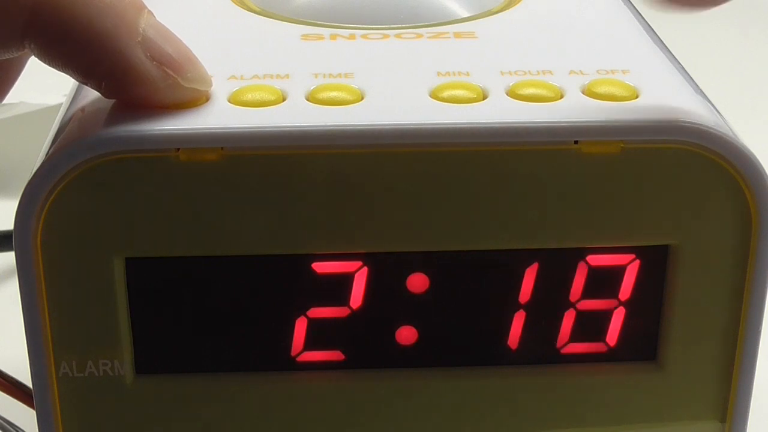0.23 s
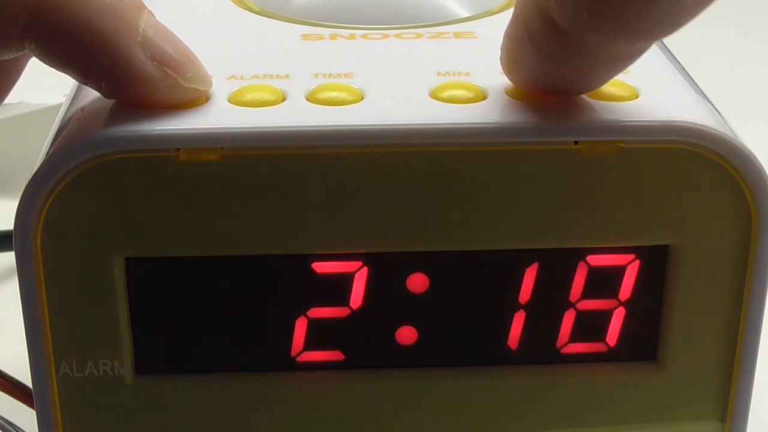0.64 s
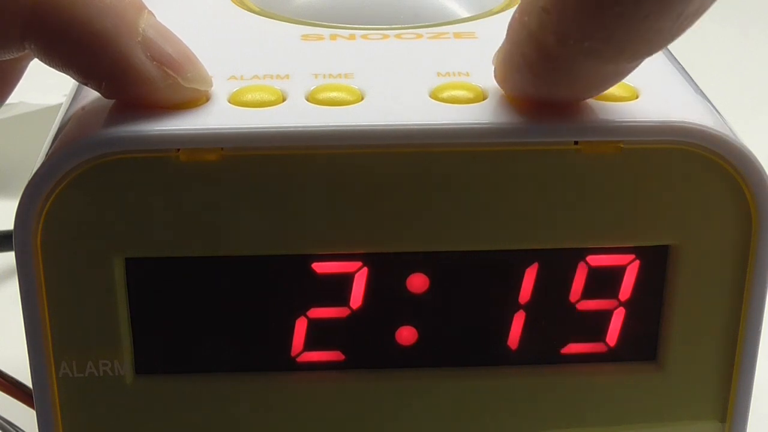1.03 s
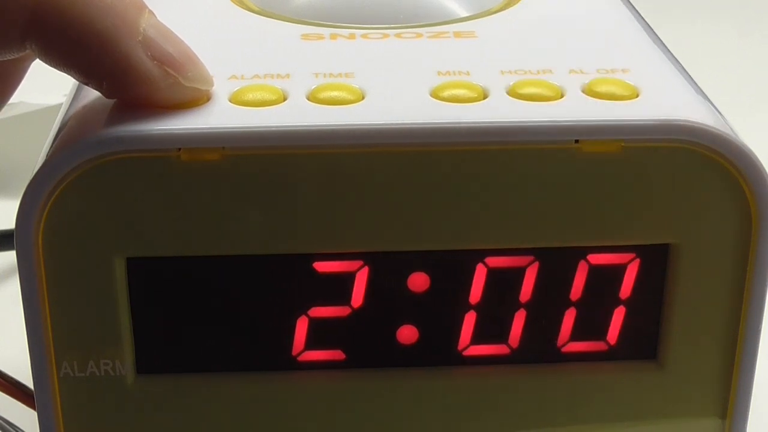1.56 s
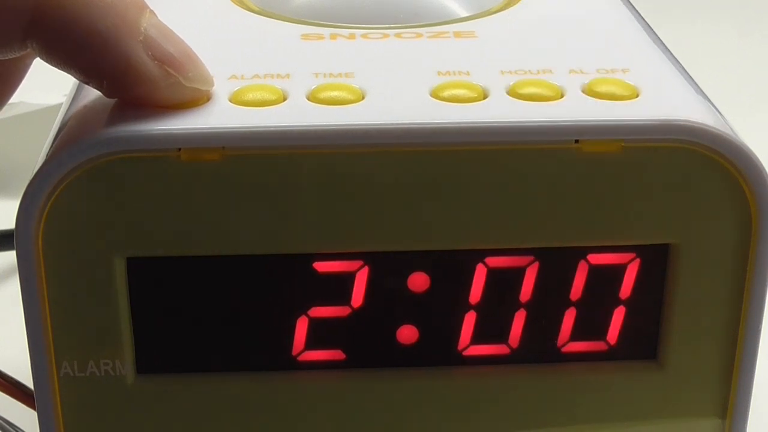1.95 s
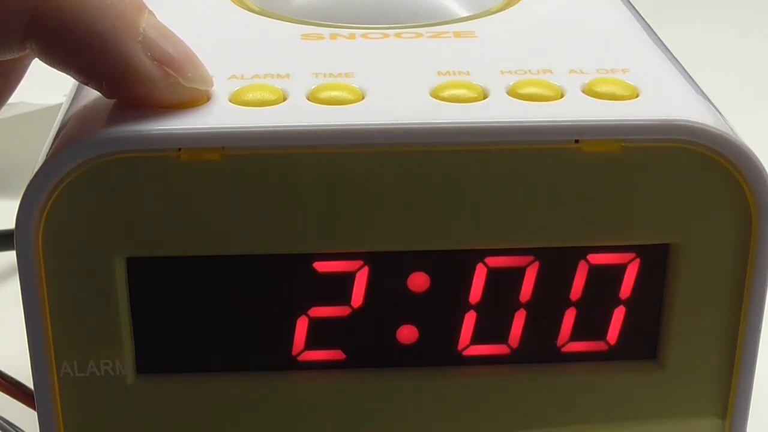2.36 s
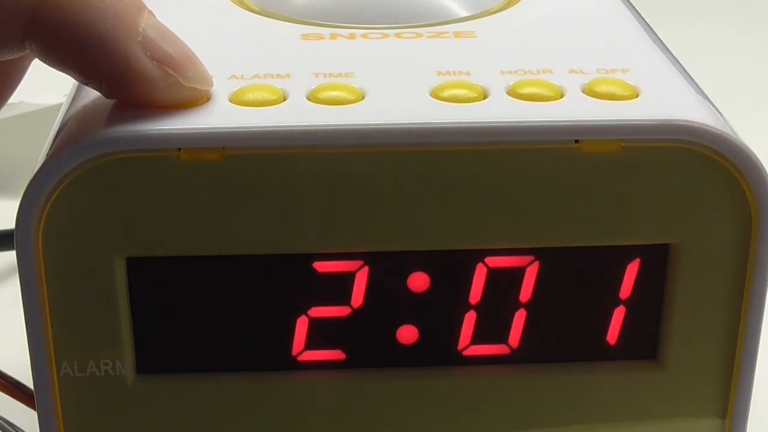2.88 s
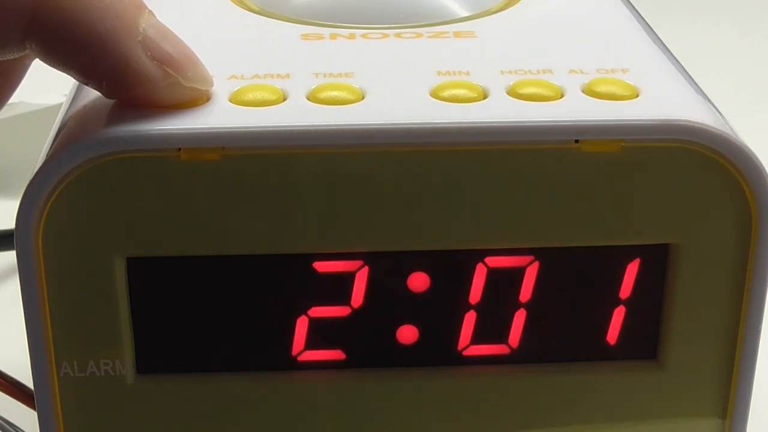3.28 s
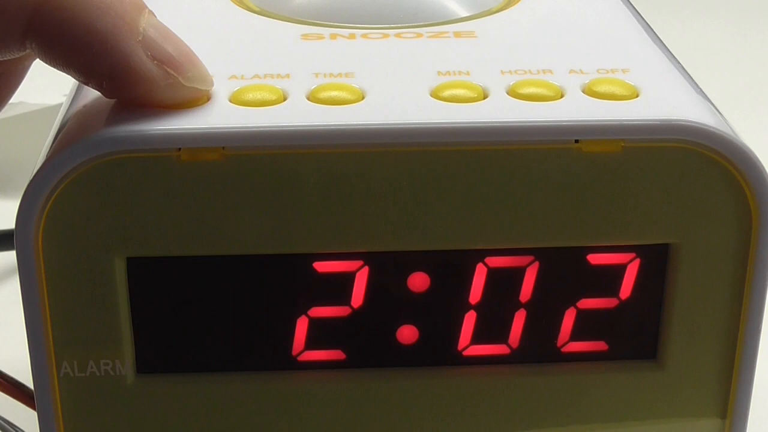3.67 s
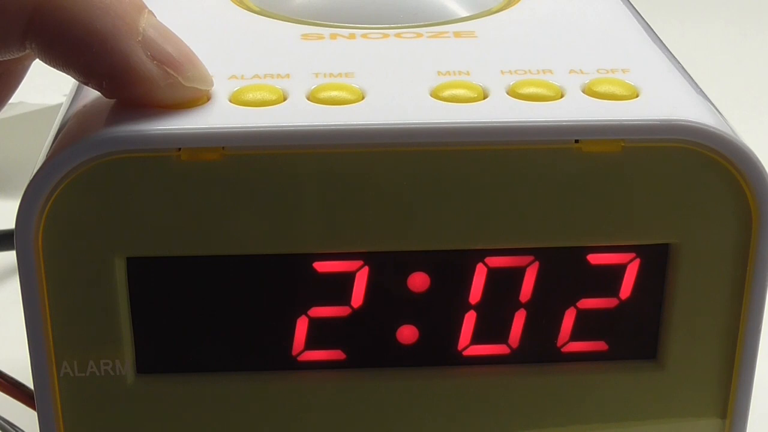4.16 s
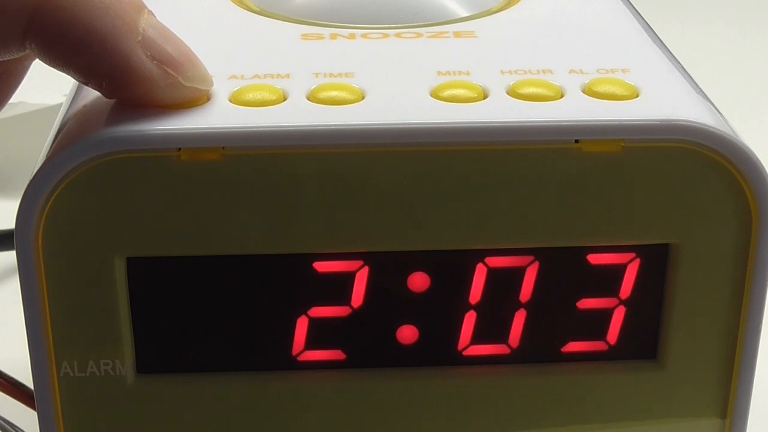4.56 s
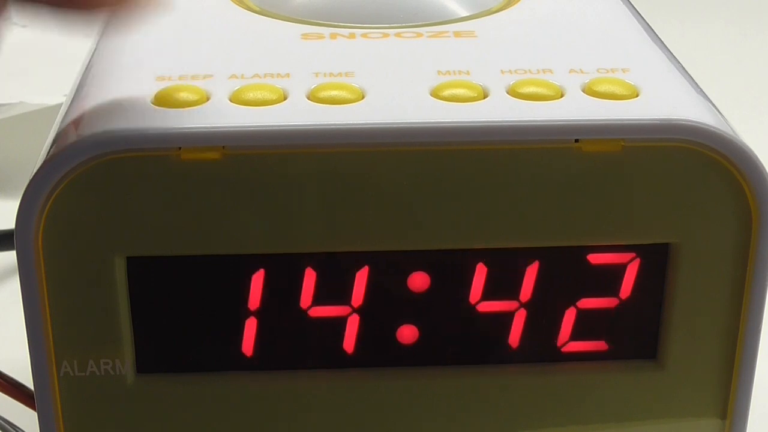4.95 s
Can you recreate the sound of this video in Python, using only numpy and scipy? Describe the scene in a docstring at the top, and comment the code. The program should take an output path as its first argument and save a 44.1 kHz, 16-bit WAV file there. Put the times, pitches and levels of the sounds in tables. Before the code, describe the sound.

Close to the microphone, a finger presses a small plastic clock button: a crisp, bright snap with a hollow case knock at about 1.3 seconds, then its spring-back click a third of a second later. A long quiet stretch follows with faint fan air, hum and hiss. Near 5.1 seconds a held button eases up with a softer, duller clunk. Small room, short echoes.

```python
"""Bedside clock button, close by

A finger settles on a plastic button of a bedside clock, clicks it down and lets it spring back; later a
held button is let go. Each click is shaped noise and short modes for the bright snap of the switch, with
slower damped modes for the hollow knock of the case, its flexing lid and the low thud on the table.
The room is small and quiet: short echoes, a faint fan, mains hum, soft hand rumble and microphone hiss."""
import sys
import numpy as np
from scipy import signal
from scipy.fft import rfft, irfft, next_fast_len
from scipy.io import wavfile
from scipy.ndimage import map_coordinates

SR = 44100
rng = np.random.default_rng(int(sys.argv[2]) if len(sys.argv) > 2 else 0)


def to_wav(s):
    """Save 16-bit WAV."""
    ch = np.atleast_2d(s).T  # columns
    pcm = np.round(np.clip(ch, -1, 1) * 32767)  # PCM
    wavfile.write(sys.argv[1], SR, pcm.astype(np.int16))


N = 229893

# Button down, spring back, held button let go: (time [s], snap before switch gain [dB], knock [dB],
# contact hardness [Hz], knock pitch [ratio], thud [dB], lid flex [dB])
CLICK_EVENTS = [(1.3162, -19, -16, 1500, 0.98, -28, -41.5), (1.6497, -17.5, -12.5, 985, .992, -29.5, -41),
                (5.0655, -34, -15.5, 707, 1.008, -29.5, -29.5)]
# Light fingertip contacts: (time [s], length [s], case level before swell [dB], rub level before swell [dB])
FINGER_TOUCHES = [(0.812, 0.018, -75, -75), (1.018, 0.011, -61, -76), (1.026, 0.049, -58.5, -74),
                  (5.135, 0.014, -57.5, -60.5)]
# Hollow case, before the knock pitch ratio: (frequency [Hz], level [dB], t60 [s], rise [s])
CASE_MODES = [(565.7, -12.5, .13, 0.056), (615, -12, 0.11, 0.0264), (652, 3, 0.045, .017),
              (701, 7.5, 0.034, 0.0048), (914, 7.5, .011, 0.003), (1010, -18, 0.045, 0.00652),
              (1255, -9.5, 0.027, 0.0019), (1350, -20.5, 0.0367, 0.001004)]
# Lid, which flexes most under the outermost button: (frequency [Hz], level [dB], t60 [s], rise [s])
LID_MODES = [(364, -1, 0.034, 0.0025), (421, 0, 0.05, .002), (497.5, 0.5, 0.059, .003)]
# Clock rocking on the table: (frequency [Hz], level [dB], t60 [s], rise [s])
TABLE_MODES = [(121, -13.5, 0.08, .0085), (157, -5, 0.045, 0.0052), (224.8, -9, 0.14, 0.0071),
               (239, 6, .069, .021), (281.7, -10, 0.14, 0.01814)]
# Stiff button and its switch, before the snap colour: (frequency [Hz], level [dB], t60 [s])
BUTTON_MODES = [(3233, -1, 0.027), (3710, -7.5, 0.023), (3886, -3, 0.021), (4770, -0.5, 0.012),
                (5130, 1, 0.011), (6560, 2, 0.011), (7000, 0, 0.0083), (7320, -2, 0.047),
                (8400, -5, 0.0065), (9740, 1, 0.033), (9300, 6.5, 0.0067), (10480, -1, 0.015),
                (12000, -4, 0.02), (13350, -8.5, .015)]
# Snap colour of a button going down: (frequency [Hz], gain [dB])
SNAP_DOWN_COLOUR = [(150, -33.5), (1300, -5), (2200, -10), (2700, -14), (3100, -2), (4000, -3), (4750, 2),
                    (5700, -6), (6300, -0.5), (8000, -3), (9600, -1), (11000, -9.5), (13600, -5.5),
                    (14600, -33)]
# Snap colour of a button springing back: (frequency [Hz], gain [dB])
SNAP_BACK_COLOUR = [(150, -36), (1400, -12.5), (1850, -5), (2800, -10.5), (3300, -1), (4600, -4),
                    (5700, -5), (6400, -2), (9300, 2.5), (10500, -3), (11400, -7.5), (12100, 0),
                    (14400, -5.5), (15500, -25)]
# Snap colour of the held button easing up: (frequency [Hz], gain [dB])
SNAP_EASE_COLOUR = [(150, -24), (400, 4), (700, 1), (1300, 9.5), (1750, 0), (2100, 4.5), (2650, -8),
                    (3300, 6.5), (4100, -14.5), (5000, 3), (6200, -14.5), (7000, -1), (8600, -13),
                    (9900, -1), (13500, -21)]
# Likeness of the snap at left and right: (frequency [Hz], likeness [0-1])
SNAP_LIKENESS = [(1000, 0.74), (3500, 0.99), (6500, 0.82), (9500, .35), (13000, 0.63)]
# Balance of the snap: (frequency [Hz], left minus right [dB])
SNAP_BALANCE = [(3000, -0.5), (4800, 0.5), (6500, -1), (9500, 3.5), (12500, -5)]
# Skin on plastic, relative spectrum: (frequency [Hz], level [dB])
RUB_SPECTRUM = [(300, -2), (1650, -5), (1930, 3.5), (2200, -9), (2900, -12), (3400, -9), (4000, -22),
                (12000, -30)]
# Decay of the room: (frequency [Hz], t60 [s])
ROOM_DECAY = [(150, 0.42), (600, 0.21), (1500, 0.1), (5000, .2), (9000, 0.16), (15000, 0.11)]
# Colour of the room: (frequency [Hz], gain [dB])
ROOM_GAIN = [(80, -11.5), (300, -7), (700, -9.5), (1200, 1.5), (3300, -4.5), (4800, -5.5), (9000, -3.5),
             (12000, -7.5), (16000, -11)]
# Likeness of the room at left and right: (frequency [Hz], likeness [0-1])
ROOM_LIKENESS = [(200, 0.48), (900, 0.79), (3500, 0.64), (6500, 0.06), (10000, 0)]
# The hand's rumble on the case, relative spectrum: (frequency [Hz], level [dB])
HAND_SPECTRUM = [(60, -30.5), (170, -16.5), (250, -1), (310, -2.5), (420, -12.5), (700, -25.5), (3000, -54)]
# The hand shifts its grip: (time of the height [s], level [dB])
GRIP_SHIFTS = [(2.597, -63.5), (3.04, -68), (3.137, -62), (4.385, -63.5)]
# Fan air, relative spectrum before resonances: (frequency [Hz], level [dB])
AIR_SPECTRUM = [(20, 4), (62, -4.5), (100, -1.5), (190, -1), (330, -0.5), (500, -5.5), (780, -5.5),
                (1200, -11.5), (1800, -16.5), (2600, -22), (6000, -25), (16000, -56)]
# Resonances that colour the fan: (frequency [Hz], width [Hz], gain [dB])
FAN_RESONANCES = [(50.8, 10, 3.5), (83.5, 8.9, 6.5), (127.3, 6.7, 9.5), (286.5, 23.8, 8), (886.6, 64, 8.5),
                  (992, 74, 7), (1445, 105, 9.5), (1613, 85, 10.5), (2186, 260, 5)]
# Mains hum and steady higher tones, before panning: (frequency [Hz], level [dB rms])
HUM_TONES = [(100, -91), (199.6, -79), (299.5, -88.5), (399.5, -85), (500, -89.5), (599.6, -82.5),
             (700, -98), (3000, -97), (7825, -93), (12000, -99.5)]
# Microphone hiss, relative spectrum: (frequency [Hz], level [dB])
HISS_SPECTRUM = [(100, -13), (2500, -8.5), (4500, -8), (6100, -14.5), (7000, -6.5), (8000, -1.5),
                 (9500, -1), (12000, 0.5), (13500, -1.5), (15600, -3.5)]
# Balance of the hiss: (frequency [Hz], left minus right [dB])
HISS_BALANCE = [(2400, -0.5), (4400, 1.5), (8000, 0), (15000, -3)]

# The hand's rumble rises from the start, then levels off
GRIP_START_DB, GRIP_RISE_DB_PER_S, GRIP_FULL_DB = -82.5, 4, -68
SHIFT_S = 0.022  # from the height of a shift to about a third of it
TOP_HZ, HISS_TOP_HZ = 16300, 15750
HALF_SIDES = np.array([[.5], [-.5]])  # left, right


def amp(db):
    """Decibels to gain."""
    return 10 ** (np.asarray(db) / 20)


def unit(x):
    """Scale to rms 1."""
    return x / np.sqrt(np.mean(x ** 2) + 1e-20)


def along(points, hz):
    """Read (frequency, value) points on a log frequency axis."""
    f, v = np.transpose(points)
    return np.interp(np.log(hz + 1), np.log(f + 1), v)


def wobble(rate):
    """A smooth random curve with rate knots a second."""
    knots = rng.standard_normal(int(N * rate / SR) + 4)
    return map_coordinates(knots, [np.arange(N) * rate / SR])


def filtered(x, response):
    """Multiply the spectrum of x by a response of frequency."""
    n = x.shape[-1]
    m = next_fast_len(n + SR // 4)
    return irfft(rfft(x, m) * response(np.fft.rfftfreq(m, 1 / SR)), m)[..., :n]


def noise(spectrum, size):
    """Coloured noise of rms 1."""
    return unit(filtered(rng.standard_normal(size), lambda hz: amp(along(spectrum, hz))))


def spread(pair, alike):
    """Mix two unrelated signals into left and right of a given likeness."""
    turn = lambda hz: np.arccos(np.clip(along(alike, hz), -1, 1)) / 2
    mid, side = filtered(pair, lambda hz: np.array([np.cos(turn(hz)), np.sin(turn(hz))]))
    return np.array([mid + side, mid - side])


def fade(t, t60):
    """Decay by 60 dB in t60 seconds."""
    return np.exp(-np.log(1000) * t / t60)


def add(track, s, sound):
    """Mix a sound into the track at s seconds."""
    part = track[:, round(s * SR):][:, :sound.shape[-1]]
    part += sound[..., :part.shape[1]]


def clicks(ring_db, switch_db=5, knock_delay=0.00041, thud_delay=.004):
    """Each snap knocks the case and flexes its lid; the clock then thuds on the table (delays in s)."""
    out, t = np.zeros((2, N)), np.arange(SR // 4) / SR
    colours = (SNAP_DOWN_COLOUR, SNAP_BACK_COLOUR, SNAP_EASE_COLOUR)
    for event, colour in zip(CLICK_EVENTS, colours):
        s, snap_db, knock_db, hard_hz, pitch, thud_db, flex_db = event
        add(out, s, amp(snap_db + switch_db) * snap(t, colour, ring_db))
        # running the case faster or slower scales its decay with its pitch
        add(out, s + knock_delay, amp(knock_db) * ring(CASE_MODES, pitch * t, hard_hz, lead=.14))
        add(out, s + knock_delay, amp(flex_db) * ring(LID_MODES, t, hard_hz, lead=.08))
        add(out, s + thud_delay, amp(thud_db) * ring(TABLE_MODES, t, hard_hz, lead=0.1))
    return out


def snap(t, colour, ring_db, tick_t60=0.0082, chatter_t60=.025, chatter_rise=0.0014, split_hz=7000):
    """The switch flips: a sharp bright tick, slower chatter below it and the button's short modes."""
    grain = rng.standard_normal((2, len(t)))
    bright = filtered(grain, lambda hz: 1 / (1 + (split_hz / (hz + 1)) ** 4))
    tick = bright * fade(t, tick_t60)
    chatter = (grain - bright) * fade(t, chatter_t60) * (1 - np.exp(-t / chatter_rise))
    modes = np.zeros((2, len(t)))
    for hz, db, t60 in BUTTON_MODES:
        cycles = hz * t + rng.random((2, 1))
        modes += amp(db) * np.sin(2 * np.pi * cycles) * fade(t, t60)
    pair = spread(tick + chatter + amp(ring_db) * modes, SNAP_LIKENESS)
    return filtered(pair, lambda hz: amp(along(colour, hz) + HALF_SIDES * along(SNAP_BALANCE, hz)))


def ring(modes, t, hard_hz, lead):
    """Damped modes swell as the blow spreads; a soft contact dulls the high ones, and left leads (rad)."""
    phase = np.array([[lead], [-lead]])
    body = np.zeros((2, len(t)))
    for hz, db, t60, rise in modes:
        envelope = fade(t, t60) * (1 - np.exp(-t / rise))
        body += amp(db) * np.sin(2 * np.pi * hz * t + phase) * envelope
    return signal.sosfilt(signal.butter(3, hard_hz, fs=SR, output="sos"), body)


def touches(case_hz=690, slip=0.046):
    """Skin drags briefly on a button; the case sings, its phase slipping (rad per sample) at random."""
    out = np.zeros((2, N))
    for s, length, case_db, rub_db in FINGER_TOUCHES:
        n = int(length * SR)
        steps = 2 * np.pi * case_hz / SR + slip * rng.standard_normal(SR // 10)
        case = unit(np.sin(np.cumsum(steps)[:n]))
        rub = noise(RUB_SPECTRUM, SR // 10)[:n]
        swell = np.sin(np.pi * np.arange(n) / n)
        add(out, s, swell * (amp(case_db) * case + amp(rub_db) * rub))
    return out


def room(x, gap=.006):
    """Nearby walls answer after a short gap (s), with a decay time for each pitch range."""
    hz, t, z = signal.stft(rng.standard_normal((2, SR // 3)), SR, nperseg=256)
    decaying = z * fade(t, along(ROOM_DECAY, hz)[:, None])
    tail = signal.istft(decaying, SR, nperseg=256)[1]
    tail = spread(tail / np.linalg.norm(tail[0]), ROOM_LIKENESS)
    tail = filtered(tail, lambda hz: amp(along(ROOM_GAIN, hz)))
    delayed = np.pad(tail, ((0, 0), (int(gap * SR), 0)))
    return signal.fftconvolve(x, delayed, axes=1)[:, :N]


def hand_rumble(t, flutter_db=0.5):
    """The hand on the case gives a soft, low noise whose level flutters and follows the grip."""
    return grip(t) * amp(flutter_db * wobble(6.5)) * noise(HAND_SPECTRUM, (2, N))


def grip(t):
    """Gain of the hand's rumble: a steady rise to a ceiling, with a brief swell at each shift."""
    held = amp(np.minimum(GRIP_START_DB + GRIP_RISE_DB_PER_S * t, GRIP_FULL_DB))
    swells = sum(amp(db) * np.exp(-((t - s) / SHIFT_S) ** 2) for s, db in GRIP_SHIFTS)
    return np.hypot(held, swells)


def fan_air(level_db=-66.0, waver_db=0.5):
    """A faint fan: air noise coloured by resonances, its level wavering slowly."""
    bumps = lambda hz: amp(sum(db * np.exp(-2 * ((hz - centre) / width) ** 2)
                               for centre, width, db in FAN_RESONANCES))
    air = unit(filtered(noise(AIR_SPECTRUM, (2, N)), bumps))
    return amp(level_db + waver_db * wobble(3.2)) * air


def mains_hum(t, drift=0.53):
    """Steady sine tones whose phases wander slowly (drift in rad)."""
    hum = np.zeros((2, N))
    for hz, db in HUM_TONES:
        # each tone keeps a fixed phase difference between left and right
        phase = 2 * np.pi * (hz * t + rng.random()) + HALF_SIDES + drift * wobble(2)
        hum += amp(db) * np.sqrt(2) * np.sin(phase)
    return hum


def microphone_hiss(level_db=-70.0):
    """Independent noise in each channel, balanced by pitch and cut off sharply at the top."""
    sides = lambda hz: amp(HALF_SIDES * along(HISS_BALANCE, hz)) * (hz < HISS_TOP_HZ)
    return amp(level_db) * filtered(noise(HISS_SPECTRUM, (2, N)), sides)


def background():
    """Fan, hum and hand rumble add up slightly to the right; hiss keeps its own balance."""
    t = np.arange(N) / SR
    return (fan_air() + mains_hum(t) + hand_rumble(t)) * amp([[-.3], [.3]]) + microphone_hiss()


def scene(room_db=-17, count=4):
    """The clock close by, slightly to the right, in its room."""
    clock = (clicks(ring_db=-21.5) + touches()) * amp([[-.2], [.2]])
    # a snap radiates a different pattern towards each wall, so its modes blur in the echoes
    walls = sum(room(clicks(ring_db=-37.5)) for _ in range(count))
    return clock + amp(room_db) * walls + background()


def record(dry, low_cut_hz=62):
    """The camera rolls off the deep bass and cuts steeply above its band limit."""
    thin = signal.sosfilt(signal.butter(2, low_cut_hz, "highpass", fs=SR, output="sos"), dry)
    return filtered(thin, lambda hz: 1 / np.sqrt(1 + (hz / TOP_HZ) ** 120))


dry = scene()
out = record(dry)
to_wav(out)
```